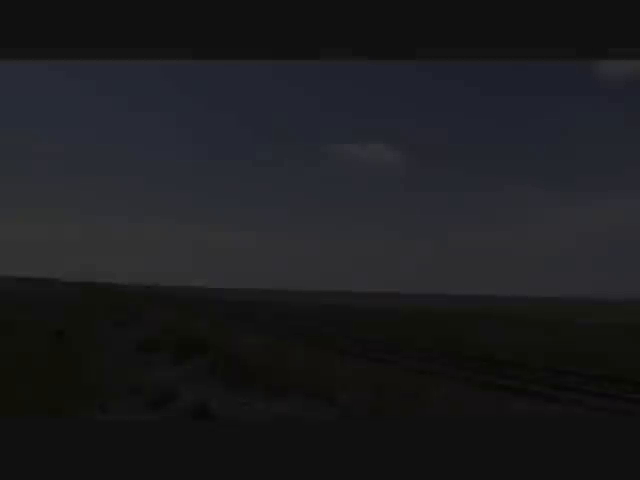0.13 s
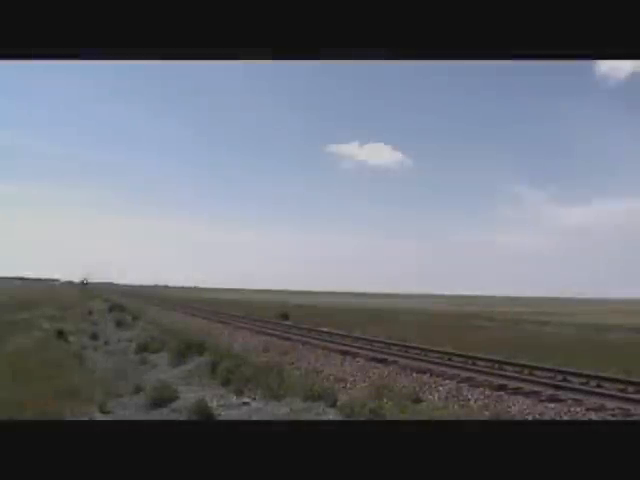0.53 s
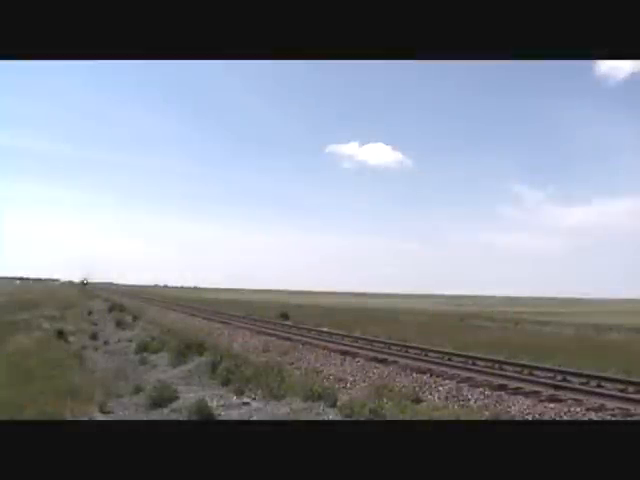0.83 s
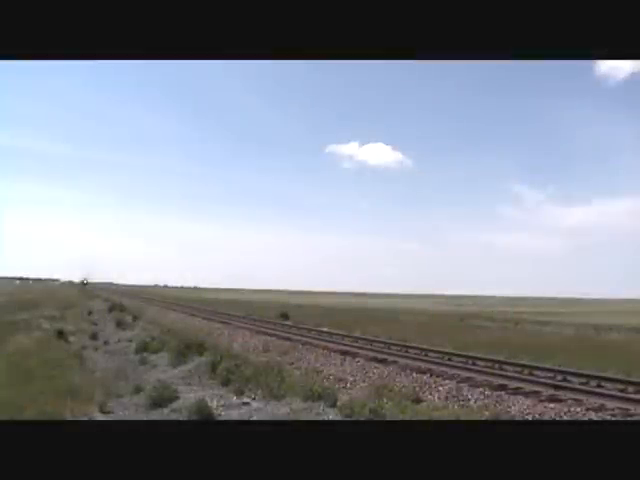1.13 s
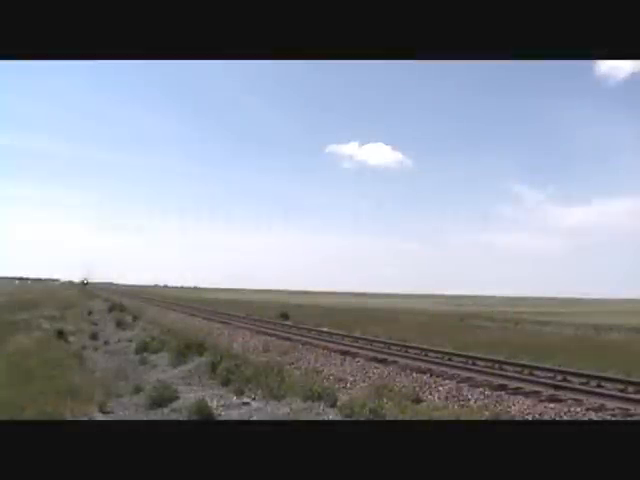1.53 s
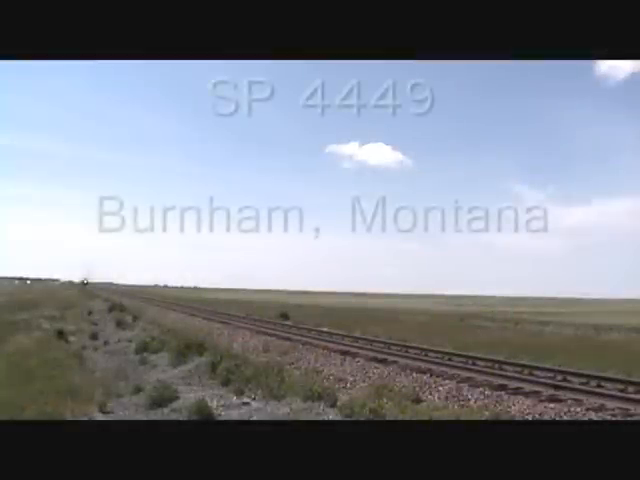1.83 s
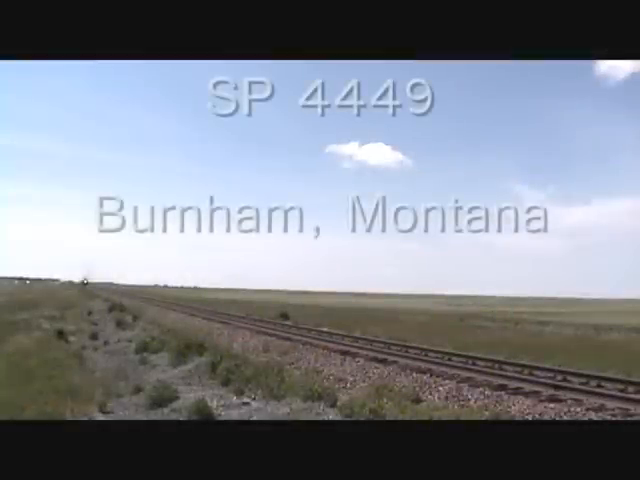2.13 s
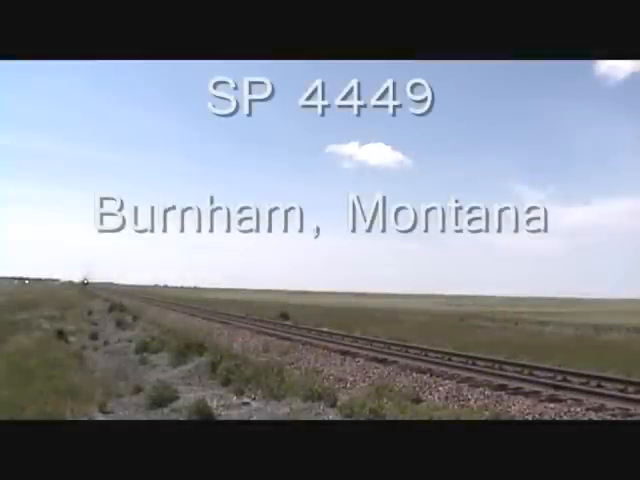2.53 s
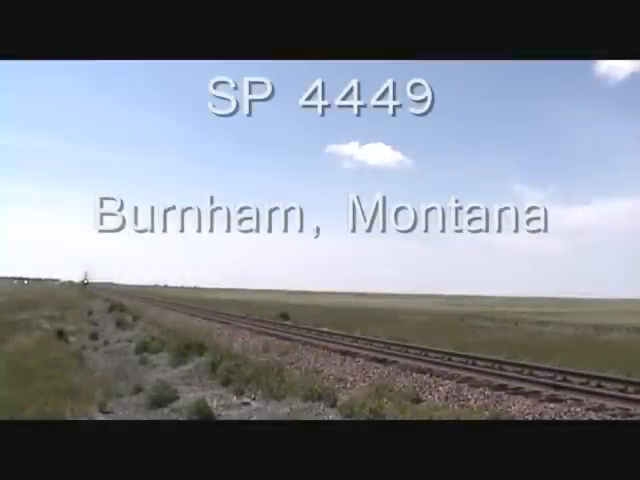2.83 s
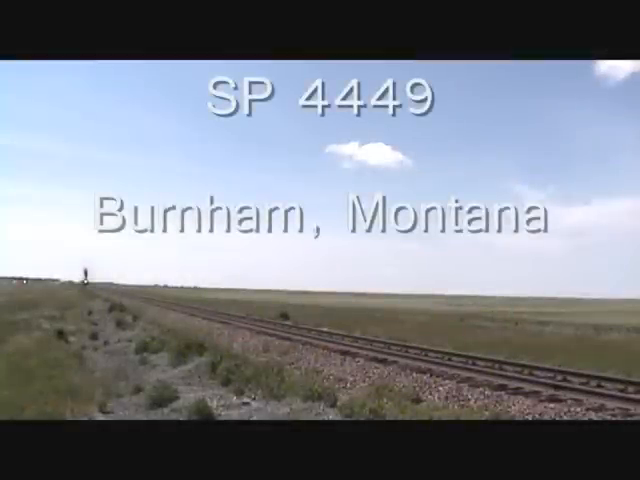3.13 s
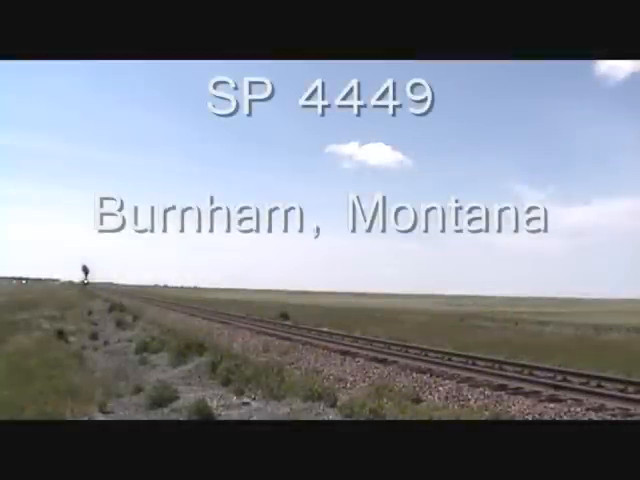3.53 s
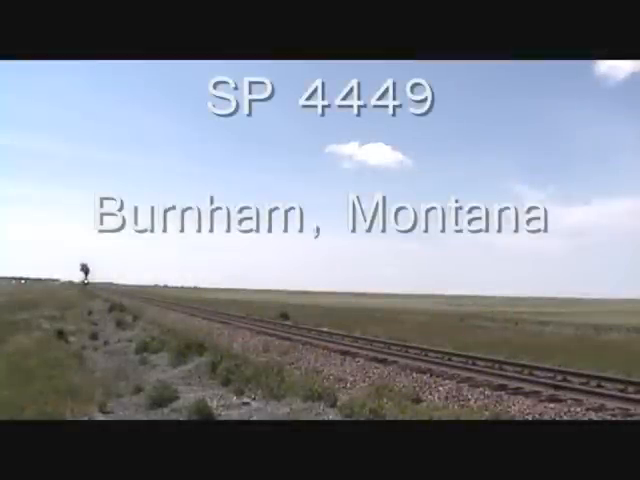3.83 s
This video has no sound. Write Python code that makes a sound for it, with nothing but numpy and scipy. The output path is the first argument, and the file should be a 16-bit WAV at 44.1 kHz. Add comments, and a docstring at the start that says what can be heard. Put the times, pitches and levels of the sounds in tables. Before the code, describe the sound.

Fast, rhythmic chuffing of a faraway steam train approaching, with soft wind hiss.

```python
"""Open prairie, beside a straight track. The sound is faded in over the first 0.8 s: grass hisses in the
wind, insects buzz nearby with a thin equipment whine, and far down the line a steam locomotive works hard.
Its exhaust beats, four to a wheel turn, are rough blasts of steam over a deep throb from the stack,
and they grow as it slowly comes nearer. From about 2.6 s gusts softly buffet the microphone,
and at 3.5 s there is one dry tick close by."""
import sys
import numpy as np
from scipy import signal
from scipy.fft import rfft, irfft
from scipy.io import wavfile
from scipy.ndimage import uniform_filter1d, map_coordinates

SR = 44100
rng = np.random.default_rng(int(sys.argv[2]) if len(sys.argv) > 2 else 0)


def int16_out(signal):
    """Quantize to a 16-bit WAV file."""
    q = np.round(np.clip(np.atleast_2d(signal).T, -1, 1) * 32767)
    wavfile.write(sys.argv[1], SR, q.astype(np.int16))


N = 176400
TIME_S = np.arange(N) / SR
BIN_HZ = np.arange(N // 2 + 1) * SR / N


def undb(db):
    """Decibels to gain."""
    return 10 ** (np.asarray(db) / 20)


def curve(points):
    """Straight lines through (t/s, value) points."""
    return np.interp(TIME_S, *np.array(points).T)


def by_frequency(points):
    """An (f/Hz, value) table spread over the spectrum on a log axis."""
    hz, value = np.array(points).T
    return np.interp(np.log(BIN_HZ + 1), np.log(hz), value)


def walk(rate_hz):
    """A smooth random drift with a spread of one, changing about rate_hz times a second."""
    drift = irfft(rfft(rng.standard_normal(N)) * np.exp(-(BIN_HZ / rate_hz) ** 2), N)
    return drift / drift.std()


def flutter(db, rate_hz):
    """A wavering gain of mean power one."""
    gain = undb(db * walk(rate_hz))
    return gain / np.sqrt(np.mean(gain ** 2))


def rush(drive, colour, width):
    """Stereo noise as strong as drive, shaped by a colour; width is the side level against the mid."""
    gain, side_gain = undb(by_frequency(colour)), undb(by_frequency(width))
    norm = np.sqrt(np.mean(gain ** 2) * (1 + side_gain ** 2))
    mid, side = rfft(rng.standard_normal((2, N)) * drive) * gain / norm
    return irfft(np.array([mid + side_gain * side, mid - side_gain * side]), N)


# Grass around the microphone, colour and stereo width: f/Hz, level/dB
GRASS_COLOUR = [(200, -1), (1000, 16), (3000, -12.5), (5500, 1.5), (7000, 0.5), (9500, 6), (12000, 6),
                (13500, -5), (15500, -37)]
GRASS_WIDTH = [(200, 0), (4000, 15), (7200, -19), (8600, -3), (9500, -6.5), (12000, 5.5), (14000, -5)]
# Its hiss, rising unevenly with the wind: t/s, level/dB
GRASS_LEVEL = [(0, -69), (.5, -64.5), (.9, -68.5), (1.25, -62.5), (1.7, -63.5), (2.25, -60), (2.7, -62.5),
               (3.1, -61), (3.45, -59.5), (3.7, -61), (4, -58.5)]

def grass():
    """Wind draws a fine hiss from the nearby grass."""
    level = undb(curve(GRASS_LEVEL)) * flutter(db=0.6, rate_hz=65)
    return rush(level, GRASS_COLOUR, GRASS_WIDTH)


# Colour of the insects near the microphone: f/Hz, level/dB
INSECT_COLOUR = [(13000, -46), (13750, -12), (13900, -1), (14150, 0), (14600, -4), (15000, -6),
                 (15400, -16), (16000, -40)]
# Swells shared by the buzz and the high tones: t/s, level/dB
BUZZ_LEVEL = [(0, -71), (1, -75), (1.6, -68), (2, -67), (2.3, -63), (2.7, -65), (3, -68), (3.5, -62.5),
              (4, -68)]
# The wavering 13.9 kHz tone is the insects'; the other three are a thin whine of steady pitch,
# probably from the camera: f/Hz, wander/Hz, level/dB against the buzz
HIGH_TONES = [(7364, 4, -19), (13905, 30, -10), (14664, 4, -17), (14966, 7, -15)]

def insects_and_whine():
    """Insects buzz at the top of hearing with one wavering tone, beside a thin equipment whine."""
    level = undb(curve(BUZZ_LEVEL)) * flutter(db=0.5, rate_hz=150)
    tones = np.zeros(N)
    for hz, wander_hz, db in HIGH_TONES:
        phase = 2 * np.pi * np.cumsum(hz + wander_hz * walk(59)) / SR
        tones += undb(db) * np.sqrt(2) * np.sin(phase)
    return rush(level, INSECT_COLOUR, width=[(14000, -3.5)]) + level * tones


# Wind right on the microphone, colour and stereo width: f/Hz, level/dB
BUFFET_COLOUR = [(15, -32), (30, -14), (50, -4), (85, 5), (130, -4.5), (200, -4), (280, -29), (500, -26),
                 (2000, -59)]
BUFFET_WIDTH = [(60, 3.5), (200, 8)]
# Gusts: t/s, half length/s, level/dB
GUSTS = [(2.73, 0.13, -43), (2.953, 0.15, -41.5), (3.346, 0.16, -53), (3.72, 0.064, -44),
         (3.833, .045, -40.5)]

def wind_buffet(lull_db=-69):
    """Gusts rumble softly on the microphone, with a faint rumble left in the lulls."""
    gusts = sum(undb(db) * np.exp(-((TIME_S - at) / half_s) ** 2) for at, half_s, db in GUSTS)
    level = (undb(lull_db) + gusts) * flutter(db=1.0, rate_hz=20)
    return rush(level, BUFFET_COLOUR, BUFFET_WIDTH)


# Colour of the tick: f/Hz, level/dB
TICK_COLOUR = [(2000, -23), (4000, -10), (5400, 2), (6800, -8), (8000, 3), (10000, -8.5), (15000, -18)]

def tick(at_s=3.499, level_db=-41, width_s=0.001, tail_db=-13, tail_s=0.009):
    """One dry tick close to the microphone, with a short rustling tail."""
    age = TIME_S - at_s
    snap = np.exp(-(age / width_s) ** 2 / 2)
    tail = undb(tail_db) * (age > 0) * np.exp(-np.abs(age) / tail_s)
    return rush(undb(level_db) * (snap + tail), TICK_COLOUR, width=[(8000, -7)])


LEAD_S, ATTACK_S, HOLD_S = 0.012, 0.03, 0.028  # timing of one exhaust beat

def valve_beats(times, levels_db, decay_s):
    """Envelope of the exhaust valve's openings: each a quick swell, a short hold and a fall."""
    power = np.zeros(N)
    for start, gain in zip(times - LEAD_S, undb(levels_db)):
        span = slice(int(start * SR), int((start + 0.5) * SR))
        age = TIME_S[span] - start
        swell = np.sin(np.clip(age / ATTACK_S, 0, 1) * np.pi / 2) ** 2
        fall = np.exp(-np.maximum(age - ATTACK_S - HOLD_S, 0) / decay_s)
        power[span] += (gain * swell * fall) ** 2
    return np.sqrt(power)


def sustain(times, levels_db):
    """An unbroken gain that glides from one beat's level to the next."""
    return undb(curve(np.c_[times + ATTACK_S + HOLD_S, levels_db]))


def second_path(sound, delay_s=0.004, wander_s=0.000318, gain=0.38):
    """Far sound arrives again by a wandering path through unsteady air, so its colour keeps shifting."""
    positions = np.arange(N) - (delay_s + wander_s * walk(1.88)) * SR
    late = np.array([map_coordinates(ear, [positions], order=3, mode="nearest") for ear in sound])
    return (sound + gain * late) / np.hypot(1, gain)


# Colour of the stack's throb, and the narrow stereo width of the whole far train: f/Hz, level/dB
THROB_COLOUR = [(20, -54), (40, -31), (55, -17.5), (68, -8.5), (77, -3.5), (87, -3.5), (101, 2), (112, -3),
                (135, -12), (180, -21), (300, -23), (600, -67)]
TRAIN_WIDTH = [(60, -25), (150, -16.5), (350, -15), (1000, -10.5), (2500, -16.5), (5000, -30)]

def stack_throb(times, levels_db, steadiness=0.47, settle_s=0.0294, pulse_depth=0.28):
    """The draught keeps a low resonance alive in the stack; it swells a little with each beat."""
    resonance = rush(1, THROB_COLOUR, TRAIN_WIDTH)
    power = uniform_filter1d(np.mean(resonance ** 2, axis=0), int(settle_s * SR))
    resonance /= power ** (steadiness / 2)  # the draught partly evens out its strength
    pulse = 1.5 + pulse_depth * (valve_beats(times, np.zeros_like(times), decay_s=0.053) - 0.5)
    return sustain(times, levels_db) * pulse * resonance / resonance.std()


# Six registers of a steam blast as heard from far off, low to high: f/Hz, level/dB
BODY_COLOUR = [(130, -24), (163, -7), (195, -16.5), (230, -10), (300, -10.5), (345, -5.5), (372, -7),
               (415, 3), (452, 0), (490, -14.5), (525, -19), (555, -7.5), (590, -12.5), (660, -51)]
BARK_COLOUR = [(540, -20), (620, -7), (665, 2), (700, -2), (745, 4.5), (780, -0.5), (815, 2), (900, -6),
               (1000, -3), (1052, 2), (1150, -3), (1300, -31), (1600, -44.5)]
BLAST_COLOUR = [(950, -31), (1150, -5), (1270, 0), (1380, -2), (1480, 1.5), (1560, 3), (1700, -4.5),
                (1850, -12), (2200, -30), (3500, -55)]
RASP_COLOUR = [(1300, -35), (1700, -7.5), (1880, 2.5), (2020, -1), (2160, -3.5), (2330, -4), (2550, -11.5),
               (3100, -29), (4500, -59)]
TREBLE_COLOUR = [(1600, -21), (2100, -4.5), (2480, 1), (3000, 0), (3430, -4.5), (3800, -14), (4400, -27),
                 (6000, -56)]
EDGE_COLOUR = [(3000, -17), (3500, -1.5), (3780, 0), (4050, -6), (4350, -6.5), (4700, -9), (5200, -18.5),
               (7000, -53)]

def steam_blasts(times, beat_db, extras_db, trail_db=-12):
    """Turbulent jets of exhaust steam, each trailing away over the plain."""
    body_db, bark_db, rasp_db, treble_db, edge_db = extras_db
    jet_roughness = flutter(db=0.94, rate_hz=255)

    def register(colour, offset_db, decay_s=0.05, lag_s=0):
        """All the beats and their trail in one colour."""
        levels_db = beat_db + offset_db
        air_shimmer = flutter(db=0.79, rate_hz=25)  # turbulence on the way to the microphone
        blasts = valve_beats(times + lag_s, levels_db, decay_s) * jet_roughness * air_shimmer
        trail = sustain(times, levels_db + trail_db)
        return rush(np.hypot(blasts, trail), colour, TRAIN_WIDTH)

    body = register(BODY_COLOUR, body_db + 0.53, decay_s=0.053, lag_s=0.0013)
    bark = register(BARK_COLOUR, bark_db + 2)
    blast = register(BLAST_COLOUR, 2)
    rasp = register(RASP_COLOUR, rasp_db - 0.05)
    treble = register(TREBLE_COLOUR, treble_db - 0.9, decay_s=0.04)
    edge = register(EDGE_COLOUR, edge_db - 12.5, decay_s=0.04)
    return body + bark + second_path(blast + rasp + treble + edge)


# Exhaust beats, before each register's own trim:
# t/s, level/dB, extra/dB in body, bark, rasp, treble and edge, throb level/dB
EXHAUST_BEATS = [(0.148, -53, -4.5, 0, -2.5, -2.5, -15, -51.5), (0.248, -44.0, -6.5, -5, -8, -7, -6, -49),
                 (0.384, -47.0, -4.5, -3, -3.5, -7, -5, -46.0),
                 (0.512, -49, -4, -5.0, -3.5, -6.5, -5, -51.5), (0.648, -50, -4.5, -3.5, -5, -2, -4, -49.5),
                 (0.783, -49.5, -3, -2.0, -2.0, 3.0, -6, -49.5),
                 (0.914, -49.0, -2.5, -2.5, -1.0, 3, 0.0, -46.5),
                 (1.041, -48.5, -3.5, -3, -1.5, -2, -2.5, -48), (1.183, -49.0, -1.5, -3, 0.5, 0, 0.0, -46),
                 (1.316, -48, -0.5, -0.0, 2.5, 2.5, 2.5, -46),
                 (1.451, -45.5, -1.5, -2.5, 0.5, 1, -2, -45.5),
                 (1.575, -47.5, -3, -2.0, 3.5, 2.5, -0.5, -46),
                 (1.715, -48, 4.5, 2.5, 1.5, 5.0, 2.5, -43.5), (1.846, -44.5, 0, 1, 2, 5.5, 4.5, -40.5),
                 (1.981, -45.0, 3.5, 2.5, 2.5, 5.5, 6, -38.5), (2.102, -45.5, 3.5, 1, 2.5, 5.0, 7, -41),
                 (2.24, -45.5, 3, 3.5, 2.5, 5, 5, -42), (2.374, -44.0, 1.5, 1.0, 3.5, 2.0, 3, -40.0),
                 (2.507, -45.0, 2.5, 3, 0.5, 4, 5.5, -37.5), (2.631, -45.0, 3.5, 1, 0.5, 0.5, 6.5, -44),
                 (2.768, -43.5, -1.5, -1.0, -1.5, -3.5, 3.5, -41.0),
                 (2.901, -41.5, 1.5, -2.0, -1.0, -3.0, 1.5, -42.5),
                 (3.029, -44.0, 1.5, 2.5, -2.5, -0.5, 1.5, -47), (3.156, -47.0, 3.5, 3.5, 0.5, 0, 4, -42),
                 (3.286, -48.5, 4.5, 4.5, 3.5, 2, 6.5, -38), (3.422, -44.5, 3.0, 2.5, 0.5, 0, 3.5, -38),
                 (3.552, -45, 2, 3.0, 0.0, -1.5, -1, -43), (3.678, -45, 0.5, 2.5, -1.0, -2.5, -2, -39.5),
                 (3.811, -47.0, 5.5, 2.5, 2, -1.5, 2, -45), (3.947, -43, 4.5, 2.5, -2, -1, 1, -37)]
# Direction of the train from the microphone: f/Hz, left minus right/dB
TRAIN_PAN = [(60, -1.5), (200, -1), (380, -1), (700, 0.5), (1290, 3.5), (2380, 4.5), (4400, 0.5),
             (8000, -8)]

def locomotive():
    """The engine labours far down the track, exhausting steam about 7.5 times a second."""
    times, beat_db, *extras_db, throb_db = np.array(EXHAUST_BEATS).T
    exhaust = steam_blasts(times, beat_db, extras_db) + stack_throb(times, throb_db - 2.5)
    pan_db = by_frequency(TRAIN_PAN) / 2
    return irfft(rfft(exhaust) * undb([pan_db, -pan_db]), N)


def scene():
    """The far train beyond the near sounds of the prairie."""
    return locomotive() + grass() + wind_buffet() + insects_and_whine() + tick()


# An edited fade-in, the whole sound rising from silence over the first 0.8 s: t/s, gain
FADE_IN = [(0, 0), (.115, 0.0034), (.16, 0.038), (.3, 0.16), (.55, 0.5), (.82, 0.94)]

def record(dry):
    """The camera cuts a comb of narrow notches and loses the very top; an edit fades the sound in."""
    spacing_hz, half_width_hz, depth, top_hz = 600, 9.1, 0.57, 15700
    off_notch_hz = BIN_HZ - spacing_hz * np.maximum(np.round(BIN_HZ / spacing_hz), 1)
    comb = 1 - depth / (1 + (off_notch_hz / half_width_hz) ** 2)
    faded = irfft(rfft(dry) * comb, N) * curve(FADE_IN)
    lowpass = signal.ellip(14, 0.1, 80, top_hz, fs=SR, output="sos")
    return signal.sosfilt(lowpass, faded)


dry = scene()
out = record(dry)
int16_out(out)
```